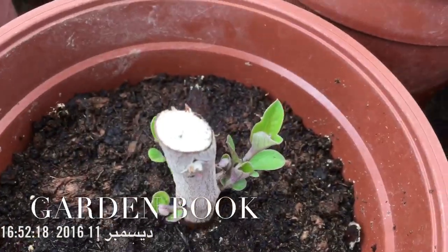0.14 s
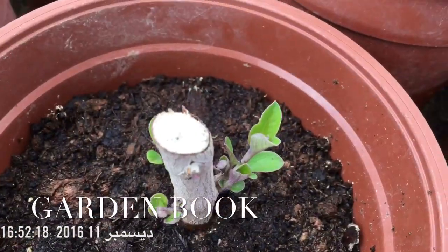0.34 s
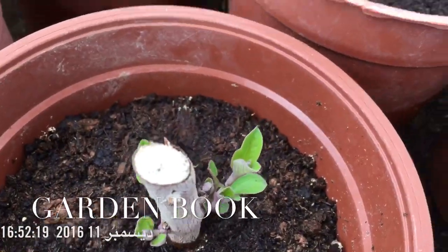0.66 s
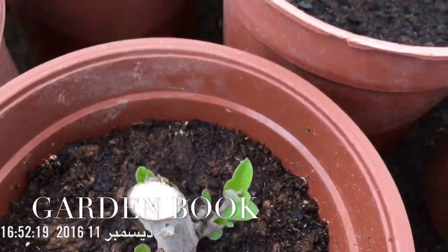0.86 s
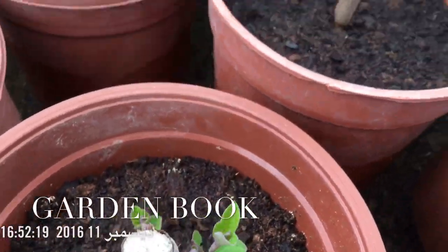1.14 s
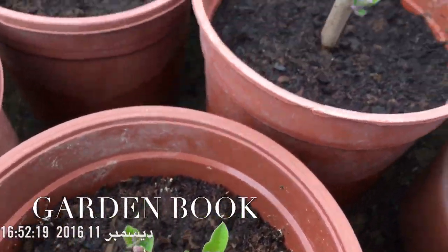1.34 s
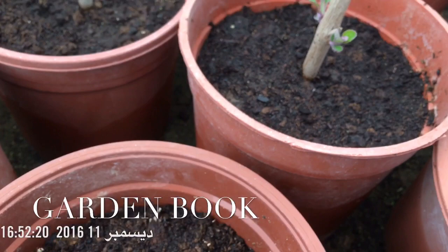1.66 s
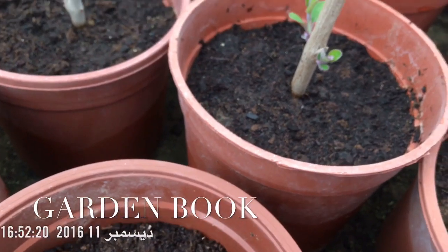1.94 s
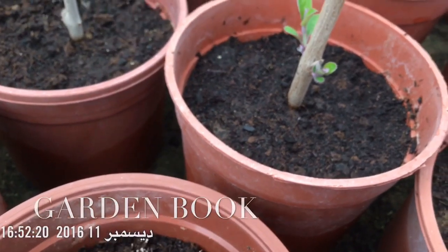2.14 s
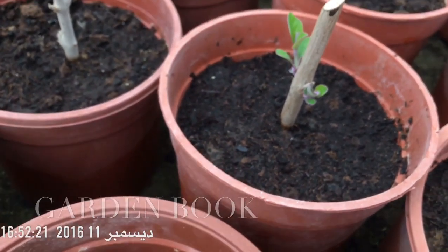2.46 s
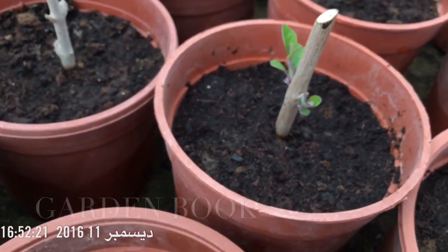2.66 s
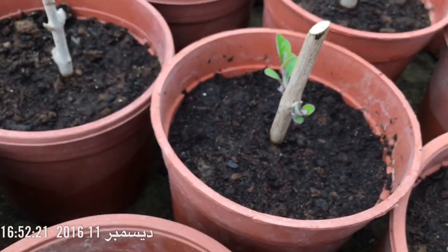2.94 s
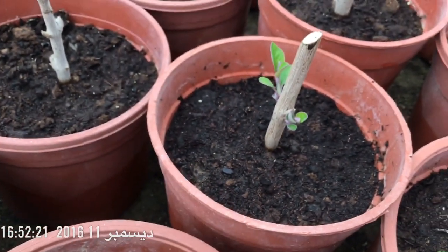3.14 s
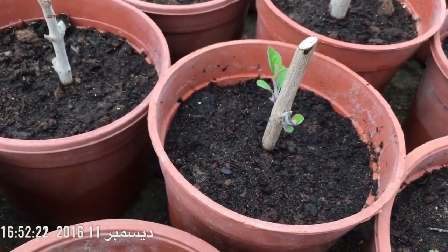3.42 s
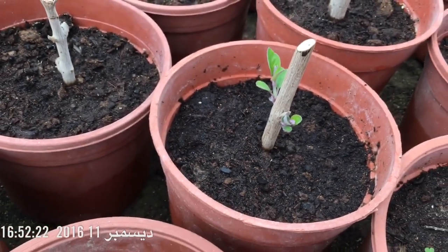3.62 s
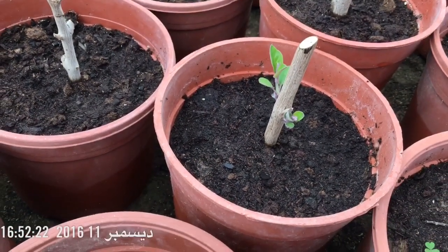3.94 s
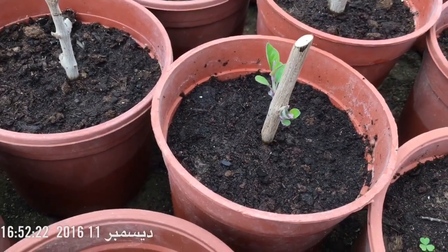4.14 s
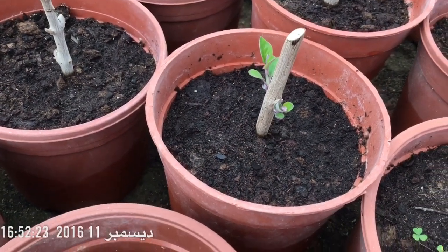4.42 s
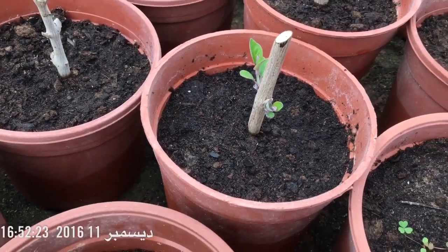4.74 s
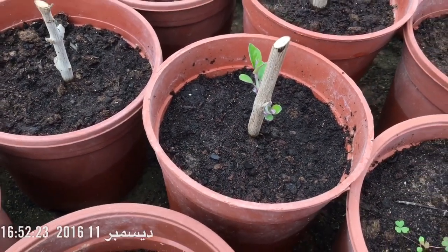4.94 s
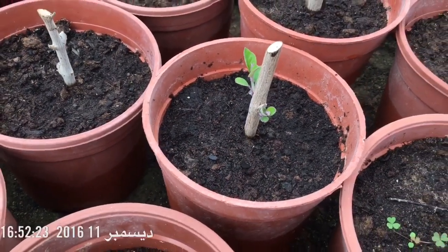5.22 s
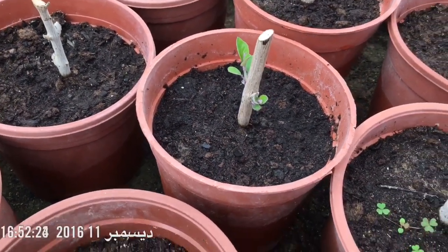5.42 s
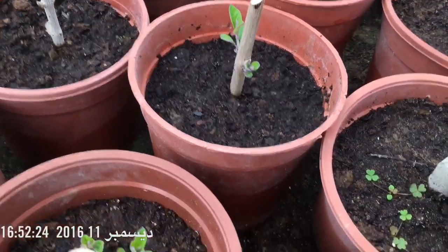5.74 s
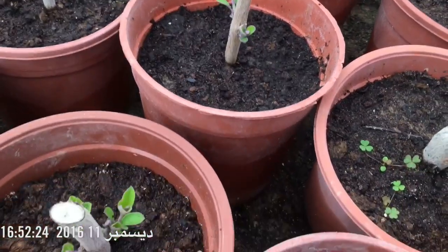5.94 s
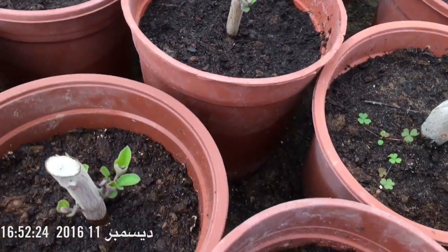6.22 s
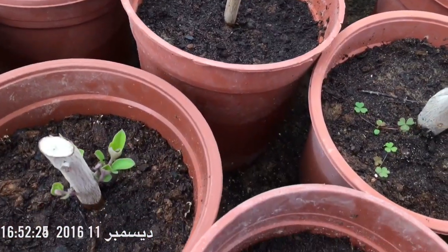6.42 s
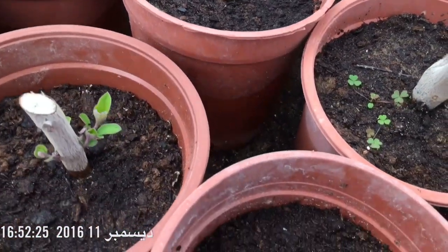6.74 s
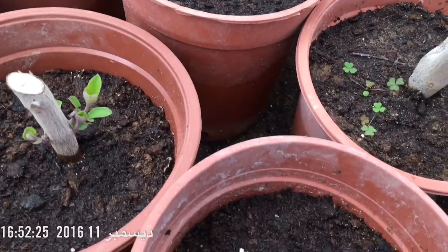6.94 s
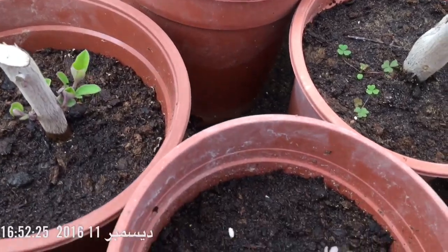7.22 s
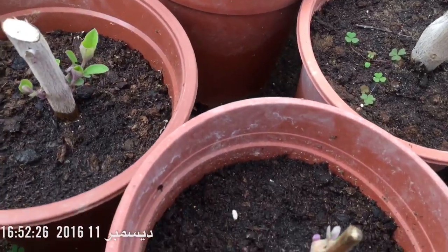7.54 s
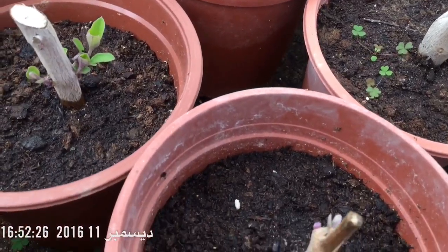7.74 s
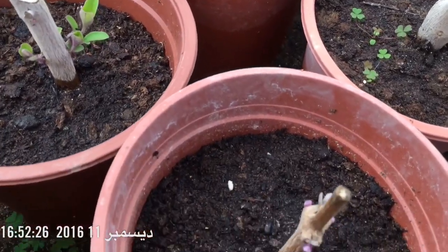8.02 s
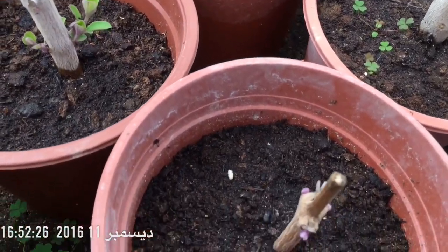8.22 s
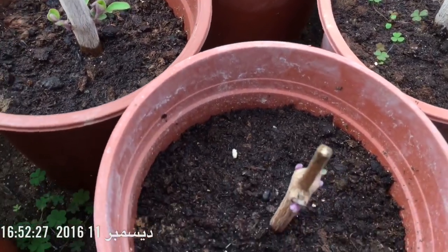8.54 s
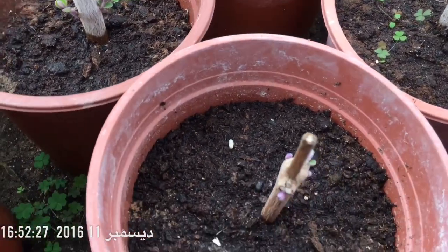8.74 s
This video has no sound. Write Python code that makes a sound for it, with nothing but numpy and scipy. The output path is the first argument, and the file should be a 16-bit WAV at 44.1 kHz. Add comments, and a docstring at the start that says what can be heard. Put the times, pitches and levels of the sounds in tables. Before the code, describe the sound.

Low distant motors dominate, recognisable as a bass hum with a muffled airy rumble. The first motor dies away before the middle; another takes over a little deeper, grows louder within about a second and stays constant. Weaker hums come and go. Over this are quiet irregular near ticks, three sharp reverberant snaps far off in the glass room, and faint intermittent hiss above steady microphone noise. The pots make no sound.

```python
"""Far machines heard in a greenhouse

Distant motors fill the glass room: one fades, another starts and holds its note, weaker ones come and go.
Each motor is a few unsteady sines tied to one shaft; patchy filtered noise makes the broad rumble beneath.
A faint hiss of bright noise switches on and off, over steady microphone noise.
Far off, the frame snaps: resonances heard mostly through the room's echoes. Nearer ticks are short
noise bursts with two rings and a little room.
"""
import sys
import numpy as np
from scipy import signal
from scipy.fft import rfft, irfft, next_fast_len
from scipy.io import wavfile
from scipy.ndimage import uniform_filter1d, map_coordinates

SR = 44100
rng = np.random.default_rng(int(sys.argv[2]) if len(sys.argv) > 2 else 0)


def dump_mix(stems):
    """Bounce the given channels to the path in sys.argv[1] as a 16-bit WAV at rate SR."""
    frames = np.atleast_2d(stems).T  # one column per channel
    limited = np.clip(frames, -1, 1)  # hard clip at full scale
    pcm = np.round(limited * 32767).astype(np.int16)
    wavfile.write(sys.argv[1], SR, pcm)


N = 391166  # length [samples]

# Microphone noise colour: (frequency [Hz], relative density [dB])
FLOOR_COLOUR = [(1500, -25), (2500, -2.5), (3500, -9.5), (5200, -5.5), (7500, -14.5), (9200, -14),
                (10500, -18), (12000, -19.5), (13500, -18), (14800, -24), (15700, -19)]
FLOOR_DB = -78

# Hiss bursts: (on [s], off [s], level at 7-14 kHz [dB])
HISS_BURSTS = [(-.1, 0.076, -68), (.43, 2.62, -72), (3.1, 3.39, -70.5), (3.7, 4.09, -70), (4.09, 4.24, -81),
               (4.36, 4.62, -70), (4.62, 5.8, -83.5), (5.76, 6.52, -72.5), (6.52, 6.8, -77),
               (6.92, 7.23, -71.5), (7.84, 8.09, -72.5), (8.75, 9, -69)]
# Hiss colour: (frequency [Hz], relative density [dB])
HISS_COLOUR = [(2000, -31.5), (3200, -6), (5000, -8.5), (6300, -2.5), (7500, -4.5), (8700, 0), (9700, -2),
               (10500, -6), (11700, -2), (13000, -7), (14200, -8.5), (15000, -11.5), (15700, -12)]
# Airy band at the start: (frequency [Hz], relative density [dB])
AIRY_COLOUR = [(3200, -34), (3900, -9.0), (4450, -6.5), (4750, -10.0), (5200, -39)]
AIRY_DB, AIRY_LOSS_DB_PER_S, AIRY_OFF_S = -72.5, 10, 1.05

# Rumble layers over time: (time [s], deep level [dB], body level at 175-290 Hz [dB],
# drone level at 335-430 Hz [dB], drone level at 520-720 Hz [dB])
RUMBLE_LEVELS = [(0.0, -48, -44, -52.5, -60), (0.12, -37, -43.5, -55, -59),
                 (1.73, -38.5, -43.5, -56.5, -65), (2.27, -42, -47, -57.5, -58),
                 (2.54, -38, -46, -57, -59.5), (3.09, -38.5, -45, -60, -64),
                 (3.14, -37.5, -48.5, -57, -59.5), (4.08, -37, -43.5, -63, -64.5),
                 (4.86, -38, -49, -59.5, -62.5), (5.63, -39, -50.5, -65, -68), (7.76, -41, -48, -58, -63),
                 (8.08, -41, -47, -58, -72), (8.75, -44, -50, -61, -69), (8.87, -39, -46.5, -58, -62.5)]
# Deep rumble colour: (frequency [Hz], relative density [dB])
DEEP_COLOUR = [(12, -77.5), (20, -40), (32, -20), (59, -7), (68, -9.5), (84, -9), (110, -25), (180, -120)]
# Body of the rumble, colour: (frequency [Hz], relative density [dB])
BODY_COLOUR = [(70, -38.5), (85, 1.5), (120, 1.5), (170, -2), (210, -8), (280, -15), (340, -27.5),
               (450, -66)]
# Two droning bands of air, lower then upper, each: (frequency [Hz], relative density [dB])
DRONE_COLOURS = [
    [(250, -31), (300, 0.5), (370, 1.5), (420, -7.5), (480, -9), (560, -45.5)],
    [(430, -28), (500, -7), (580, 1.5), (625, -5.5), (670, -3), (760, -11.5), (900, -49)],
]
# Whir colour: (frequency [Hz], relative density [dB])
WHIR_COLOUR = [(600, -28), (780, -3), (1070, 0.5), (1440, -5.5), (1640, -6), (2200, -10.5), (2820, -22),
               (4500, -26.5), (6000, -50.5)]
SWELL_DB = 1  # scale of the random swell of every layer but the whir
WHIR_DB = -62  # level at 800-1900 Hz before it sinks
WHIR_DROP_DB, WHIR_DROP_S, WHIR_EASE_S = 4.5, 4.63, 0.9  # how far, when and how slowly it sinks

# Glass room decay: (frequency [Hz], time to fall 60 dB [s])
ROOM_DECAY = [(1500, .75), (4500, 0.59), (9000, 0.34), (14000, 0.11)]
# Echo build-up, shorter in the highest treble: (frequency [Hz], share of the build-up time [1])
BUILD_SHARE = [(5000, 0.72), (8000, 0.77), (12000, 0.2)]

# Near ticks: (time [s], level [dB], ring [Hz], ring width [Hz], upper ring [Hz],
# relative upper level before sharpening [dB], burst length [s], room relative to burst [dB])
TICKS = [ (0.864, -51.5, 1290, 600, 3300, -3, 0.008, -1.5), (1.093, -64, 3520, 500, 5500, -9, .004, -2.5),
         (1.757, -69.5, 1600, 600, 3000, 1, 0.033, -3), (2.174, -65, 3480, 1200, 7000, -12, 0.0046, -17),
         (4.84, -72, 4540, 3000, 9070, -1.5, 0.0032, -11.5), (4.905, -69, 1990, 900, 3030, 1.5, .003, -10),
         (4.98, -64.5, 2300, 907, 6010, -5.5, .006, -10.5),
         (5.211, -66, 3640, 351, 7970, -9.5, 0.0057, -2.5),
         (5.924, -55.5, 1000, 1190, 9800, -12.5, 0.0061, -3.5),
         (5.989, -70, 2270, 1800, 4030, -5, 0.013, -6.5), (8.428, -71.5, 2385, 200, 4740, -25, .02, -2.5),
         (8.736, -68.5, 2480, 1500, 5000, -9.5, 0.012, 10), ]
UPPER_WIDTH = 0.53  # width of the upper ring over its pitch

# Far snaps of the frame: (time [s], level over the first 50 ms [dB], treble rise [s])
SNAPS = [(1.1439, -43.5, 0.0022), (2.6868, -50.5, 0.0009), (6.331, -48.5, .004)]
# Part of the frame behind each snap, resonances before sharpening:
# (frequency [Hz], width [Hz], relative level [dB])
FRAME_PARTS = [
    [(2206, 215, 2), (3280, 450, -2.5), (4270, 700, -5), (6170, 620, -3.5), (8920, 1900, -9),
     (11740, 1400, -10), (14000, 2700, -15)],
    [(1940, 193, 2), (2660, 460, .5), (4580, 600, -4.5), (5640, 480, -2.5), (8300, 840, -6),
     (10970, 770, -9.5), (12900, 1200, -14.5)],
    [(2050, 230, 2), (3180, 400, -2), (4220, 700, -8), (6300, 1300, -7), (8800, 1500, -9.5),
     (12300, 1200, -9), (14200, 1300, -19)],
]
BUILD_S, CRACK_DB = 0.042, -9  # echo build-up, direct crack beside a room tail of energy 1

# Weaker motors, gliding towards a final speed; the rows from -0.06 s and 1.3 s hold the octave of the first
# motor as it sinks: (on [s], off [s], main line at on [Hz], final main line [Hz], settling [s], level at on
# [dB], loss [dB/s], waver [Hz], flutter [dB], orders as (multiple of the main line [1], relative level [dB]))
WEAK_MOTORS = [ (-0.3, 2.48, 161.5, 148, 2.2, -33.5, 3, .3, 2.6, [(1, -0.5)]),
               (3.05, 7.5, 151, 140, 4, -39, 2.5, 0.21, 2, [(1, 0)]),
               (0.08, 2.35, 56, 55, 2.97, -40.5, .3, 0.83, 3.6, [(1, 0), (3 / 2, -10.5), (3, -1.5)]),
               (3, 4.12, 80.5, 77, 1.5, -37, .3, .43, 2.27, [(1, 0), (1 / 2, -2.5), (3 / 2, -4.5)]),
               (8, 12, 77.3, 77, 1.5, -42.5, .3, 0.47, 2.2, [(0.95, 0), (1 / 2, -2.1), (3 / 2, -3.2)]),
               (-0.06, 0.705, 322, 316, 0.7, -47.5, .1, .8, 1.6, [(1, 0)]),
               (4.5, 8.4, 254, 248, 1.5, -57.5, 0.36, 1.5, 3, [(1, -0.5)]),
               (1.3, 3.2, 309, 300, 2.16, -55, 3, 0.87, 1.5, [(1, 0)]), ]
# Loud motor that fades: (time [s], main line [Hz], level [dB])
FADING = [(0, 110.5, -31.5), (1.8, 111, -32.5), (2.1, 111.6, -37), (2.5, 111.6, -32.5), (3.3, 111.6, -34.5),
          (3.8, 111, -43)]
# Loud motor that starts and holds: (time [s], main line [Hz], level [dB])
STARTING = [(3.9, 88.7, -38.5), (4.45, 90.56, -30), (5.05, 90.64, -24.5), (5.3, 91.59, -26.5),
            (6, 92.1, -26.5), (8, 92.38, -26), (8.87, 91.76, -26)]
RISE_S, FALL_S = 0.12, 0.29  # switching softness of the weaker motors

TOP_HZ = 15750  # upper band limit


def amp(db):
    """Decibels to amplitude."""
    return 10 ** (np.asarray(db) / 20)


def unit(x):
    """Scale to rms 1."""
    return x / np.sqrt(np.mean(x ** 2) + 1e-20)


def along(points, hz):
    """Interpolate (frequency [Hz], value) points on a log frequency axis."""
    f, v = np.transpose(points)
    return np.interp(np.log(hz + 1), np.log(f + 1), v)


def curves(rows):
    """One value per sample for each column after the time."""
    s, *cols = np.transpose(rows)
    return [np.interp(np.arange(N) / SR, s, c) for c in cols]


def wobble(rate):
    """A smooth random curve with rate knots a second."""
    coarse = np.arange(0, N + 64, 64)
    knots = rng.standard_normal(int(N * rate / SR) + 4)
    smooth = map_coordinates(knots, [coarse * rate / SR])
    return np.interp(np.arange(N), coarse, smooth)


def switched(on, off, rise, fall):
    """A gain that rises softly around on and falls softly around off [s]."""
    t = np.arange(N) / SR
    opening = 0.5 + 0.5 * np.tanh((t - on) / rise)
    closing = 0.5 + 0.5 * np.tanh((off - t) / fall)
    return opening * closing


def filtered(x, response):
    """Multiply the spectrum of x by a response of frequency."""
    m = next_fast_len(len(x) + SR // 2)
    return irfft(rfft(x, m) * response(np.fft.rfftfreq(m, 1 / SR)), m)[:len(x)]


def highpass(x, corner_hz):
    """Take away what lies below the corner, without delay."""
    return filtered(x, lambda hz: hz ** 6 / (hz ** 6 + float(corner_hz) ** 6))


def rush(spectrum, patchy_db, size=12, band=(0, SR)):
    """Coloured noise with random gain patches, size frames long; rms 1 inside the band [Hz]."""
    z = signal.stft(rng.standard_normal(N + 512), nperseg=512)[2]
    across_hz = uniform_filter1d(rng.standard_normal(z.shape), 3, 0)
    patches = unit(uniform_filter1d(across_hz, size, 1))
    noise = signal.istft(z * amp(patchy_db * patches), nperseg=512)[1][:N]
    noise = filtered(noise, lambda hz: amp(along(spectrum, hz)))
    in_band = filtered(noise, lambda hz: (hz >= band[0]) & (hz < band[1]))
    return noise / np.std(in_band)


def resonances(modes):
    """Causal response of a few damped modes, with alternating signs."""
    def response(f):
        total = 0
        for k, (centre, width, db) in enumerate(modes):
            damping = 1j * f * width
            total = total + (-1) ** k * amp(db) * damping / (centre ** 2 - f ** 2 + damping)
        return total
    return response


def echoes(build):
    """A fresh room tail of energy 1: lumpy echoes hold for a moment, then decay by frequency."""
    hz, t, z = signal.stft(rng.standard_normal(SR), SR, nperseg=128)
    late = np.maximum(t - build * along(BUILD_SHARE, hz)[:, None], 0)
    lumps_db = 1.3 * unit(uniform_filter1d(rng.standard_normal(len(t)), size=3))
    decay_db = 60 * late / along(ROOM_DECAY, hz)[:, None]
    tail = signal.istft(z * amp(lumps_db - decay_db), SR, nperseg=128)[1][:SR]
    return tail / np.linalg.norm(tail)


def microphone_noise():
    """The steady noise floor of the microphone: patchy coloured noise."""
    return amp(FLOOR_DB) * rush(FLOOR_COLOUR, patchy_db=3.4)


def hiss():
    """Faint bright noise switching on and off, with a thin airy band sinking away at the start."""
    level = sum(amp(db) * switched(on, off, 0.055, 0.095) for on, off, db in HISS_BURSTS)
    bursts = level * amp(0.4 * wobble(8)) * rush(HISS_COLOUR, patchy_db=1.7, band=(7000, 14000))
    airy_level = amp(AIRY_DB - AIRY_LOSS_DB_PER_S * np.arange(N) / SR)
    airy_level = airy_level * switched(-1, AIRY_OFF_S, 0.1, 0.12)
    return bursts + airy_level * rush(AIRY_COLOUR, patchy_db=0.0)


def swell(db):
    """The gain of a level curve with a slow random swell of its own."""
    return amp(db + SWELL_DB * wobble(4))


def rumble():
    """Broad noise of the far machines in layers, deep to bright; the whir sinks once."""
    deep_db, body_db, low_db, high_db = curves(RUMBLE_LEVELS)
    low_colour, high_colour = DRONE_COLOURS
    deep = swell(deep_db) * rush(DEEP_COLOUR, patchy_db=1.0)
    body = swell(body_db) * rush(BODY_COLOUR, patchy_db=1.52, band=(175, 290))
    low = swell(low_db) * rush(low_colour, patchy_db=0.8, band=(335, 430))
    high = swell(high_db) * rush(high_colour, patchy_db=1.5, band=(520, 720))
    whir_db = WHIR_DB - WHIR_DROP_DB * switched(WHIR_DROP_S, 20, WHIR_EASE_S, 1)
    whir = amp(whir_db) * rush(WHIR_COLOUR, patchy_db=2.07, size=40, band=(800, 1900))
    return deep + body + low + high + whir


def ticks():
    """Small near ticks: a brief grainy burst excites two rings, with a little room."""
    out, t = np.zeros(N + SR), np.arange(SR) / SR
    for s, db, ring_hz, width_hz, upper_hz, upper_db, length, room_db in TICKS:
        envelope = np.sin(np.pi * np.clip(t / length, 0, 1)) ** 0.5
        burst = rng.standard_normal(SR) * envelope
        sound = burst + amp(room_db) * np.linalg.norm(burst) * echoes(length)
        rings = resonances([(ring_hz, width_hz, 0), (upper_hz, UPPER_WIDTH * upper_hz, upper_db)])
        sound = filtered(sound, lambda hz: rings(hz) * abs(rings(hz)) ** 0.5)  # sharpened: steeper skirts
        onset_rms = np.std(sound[:round(length * SR)])
        out[round(s * SR):][:SR] += amp(db) * sound / onset_rms
    return out[:N]


def snaps():
    """Far sharp cracks of the frame, heard mostly through the room; the treble builds up late."""
    out, t = np.zeros(N + SR), np.arange(SR) / SR
    for (s, db, treble_rise), modes in zip(SNAPS, FRAME_PARTS):
        sound = echoes(BUILD_S) * np.minimum(t / 0.0069, 1)  # the first echoes are weak
        sound[0] += amp(CRACK_DB)
        ring = resonances(modes)
        sound = filtered(sound, lambda hz: ring(hz) * abs(ring(hz)) ** 0.31)  # sharpened
        sound = highpass(sound, 1500)  # thin parts radiate no bass
        sound = sound - highpass(sound, 4400) * np.exp(-t / treble_rise)
        out[round(s * SR):][:SR] += amp(db) * sound / np.std(sound[:SR // 20])
    return out[:N]


def tone(hz, db, waver_hz, flutter_db):
    """A slightly unsteady sine around the given pitch and rms level."""
    phase = 2 * np.pi * (np.cumsum(hz + waver_hz * wobble(6)) / SR + rng.random())
    return np.sqrt(2) * amp(db + flutter_db * wobble(7)) * np.sin(phase)


def shaft(hz, db, orders, waver_hz, flutter_db):
    """A turning shaft: tones at fixed multiples of its main line, each a little unsteady."""
    return sum(tone(k * hz, db + rel_db, waver_hz, flutter_db) for k, rel_db in orders)


def motors():
    """The far motors: one fading, one starting, and weaker ones easing towards a final speed."""
    t = np.arange(N) / SR
    fading = shaft(*curves(FADING), [(1, 0), (1 / 3, -12)], 0.26, 0.46)
    out = switched(-1, FADING[-1][0], 0.87, 0.12) * fading
    starting = shaft(*curves(STARTING), [(1, 0), (2, -26.5)], 0.15, 0.31)
    out = out + switched(STARTING[0][0], 12, 0.1, 0.97) * starting
    for on, off, first_hz, final_hz, settle, db, loss_db, waver_hz, flutter_db, orders in WEAK_MOTORS:
        since = t - on
        glide = np.exp(-np.maximum(since, -0.3) / settle)
        hz = final_hz + (first_hz - final_hz) * glide
        sound = shaft(hz, db - loss_db * since, orders, waver_hz, flutter_db)
        out = out + switched(on, off, RISE_S, FALL_S) * sound
    return out


def scene():
    """Everything at the microphone, from the background to the motors, in one channel."""
    return (microphone_noise() + hiss() + rumble() + ticks() + snaps() + motors())[None]


def record(dry):
    """A 4 ms fade at each end, and nothing kept above the band limit."""
    to_edge = np.minimum(np.arange(N), N - np.arange(N))
    fade = np.clip(to_edge / (SR / 250), 0, 1)
    return filtered(dry[0] * fade, lambda hz: hz < TOP_HZ)[None]


dry = scene()
out = record(dry)
dump_mix(out)
```